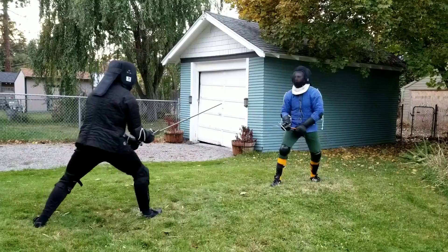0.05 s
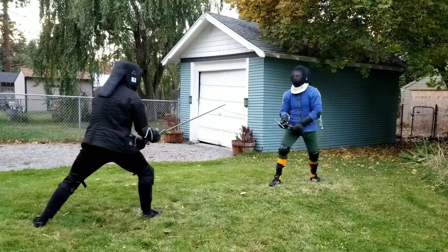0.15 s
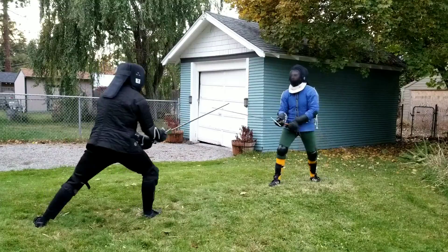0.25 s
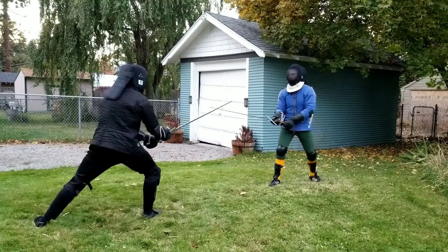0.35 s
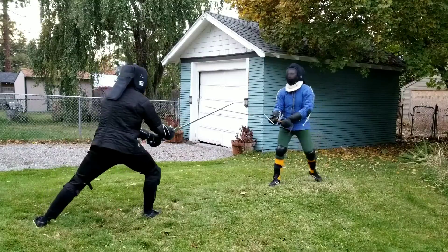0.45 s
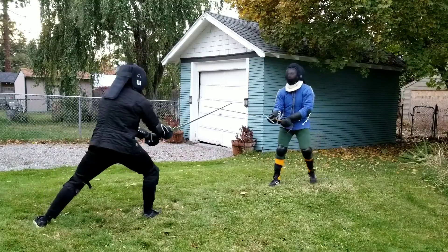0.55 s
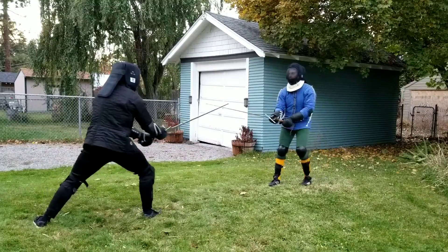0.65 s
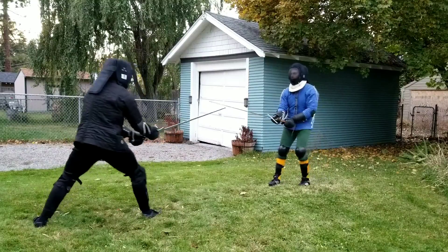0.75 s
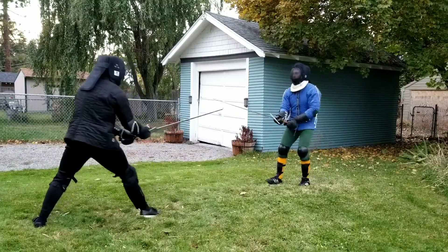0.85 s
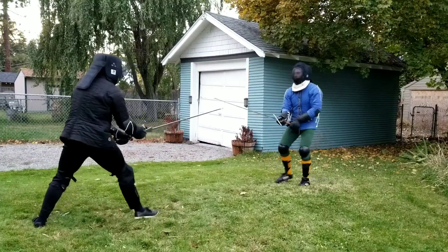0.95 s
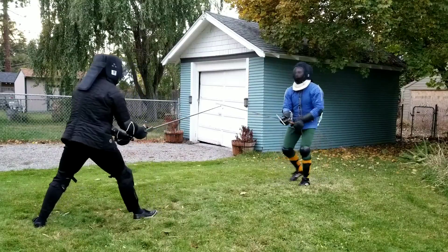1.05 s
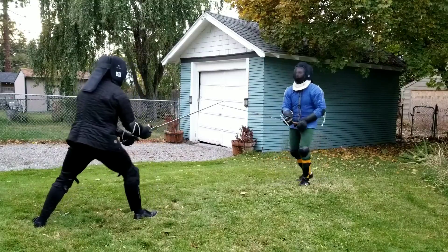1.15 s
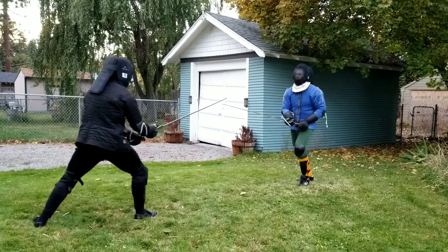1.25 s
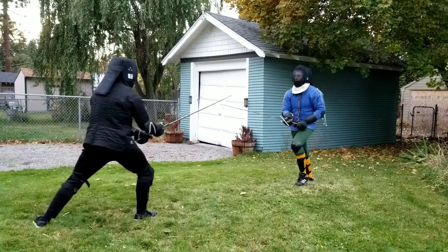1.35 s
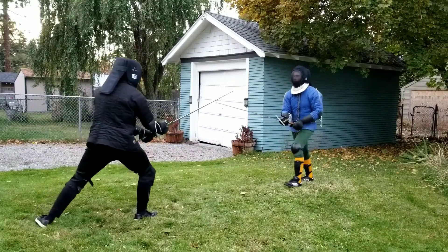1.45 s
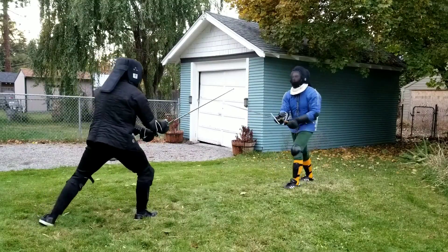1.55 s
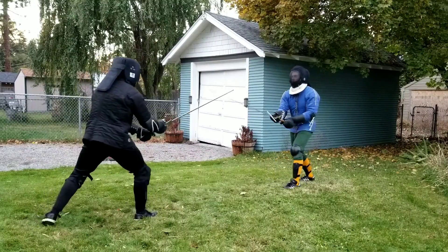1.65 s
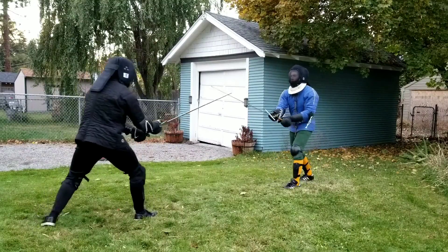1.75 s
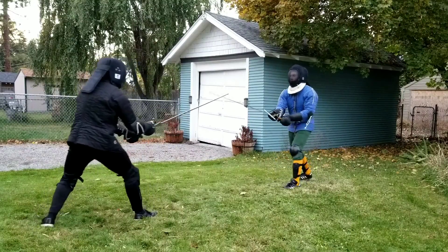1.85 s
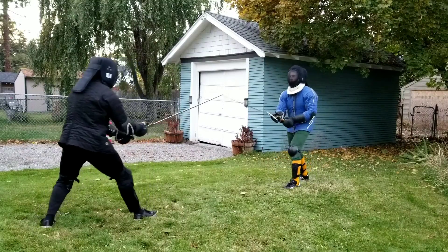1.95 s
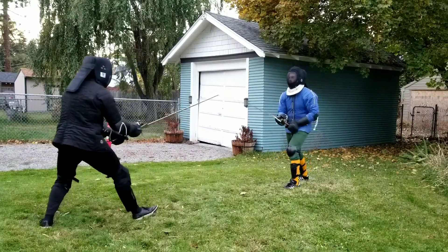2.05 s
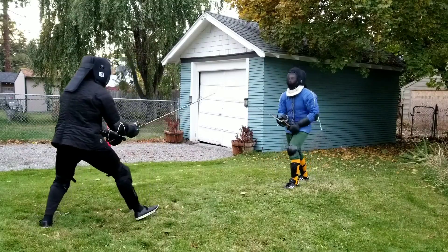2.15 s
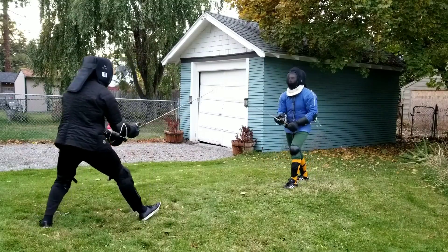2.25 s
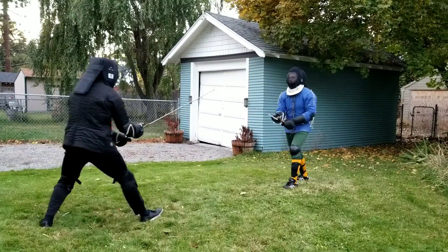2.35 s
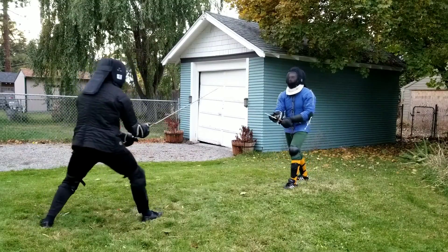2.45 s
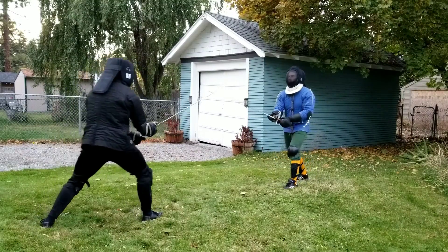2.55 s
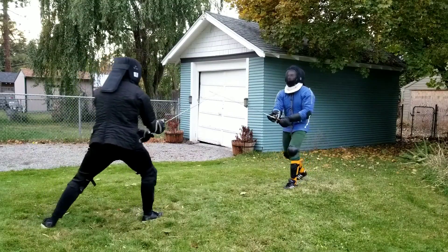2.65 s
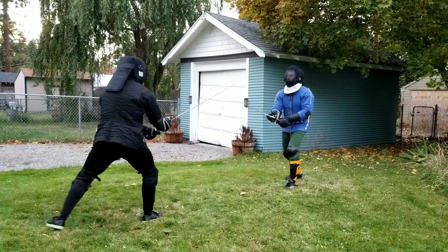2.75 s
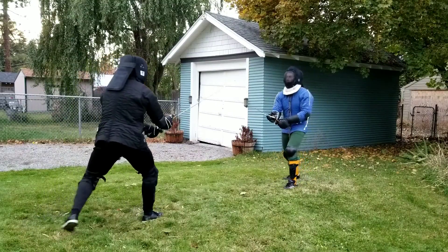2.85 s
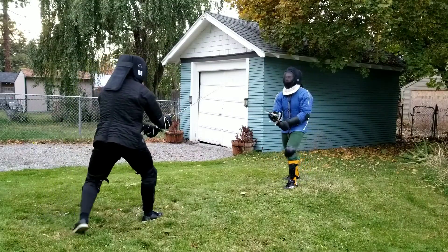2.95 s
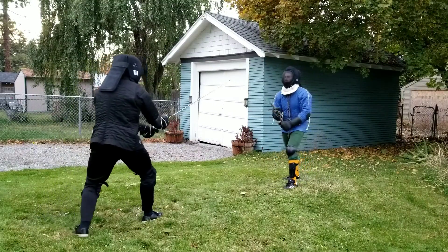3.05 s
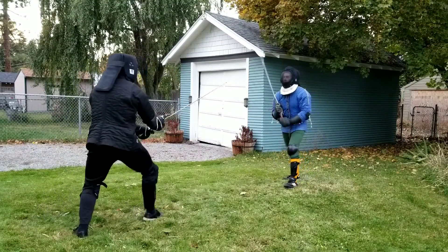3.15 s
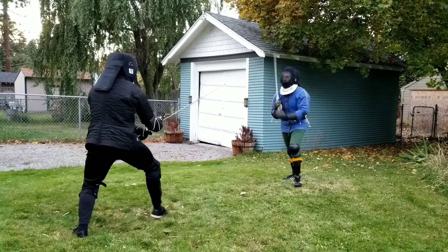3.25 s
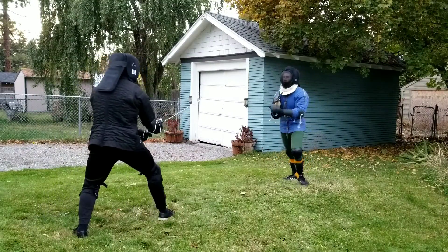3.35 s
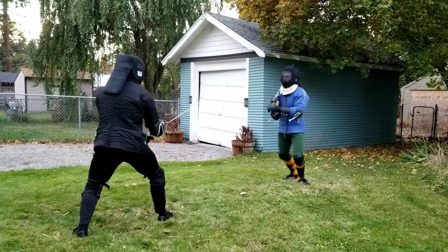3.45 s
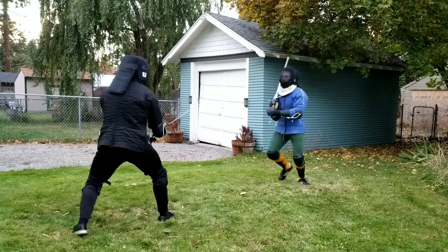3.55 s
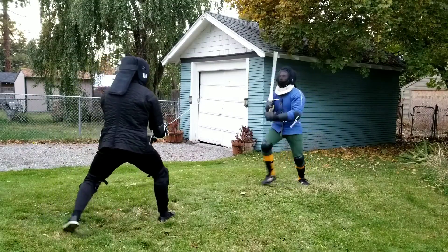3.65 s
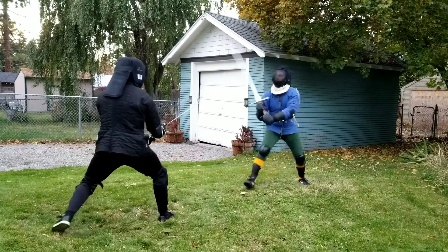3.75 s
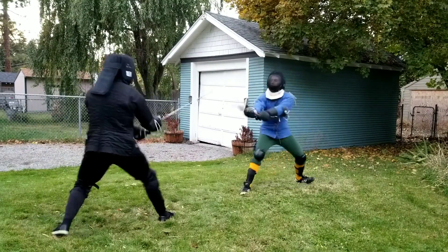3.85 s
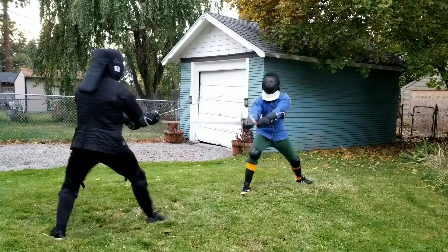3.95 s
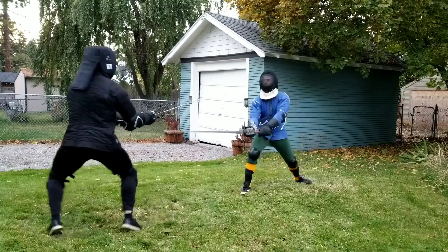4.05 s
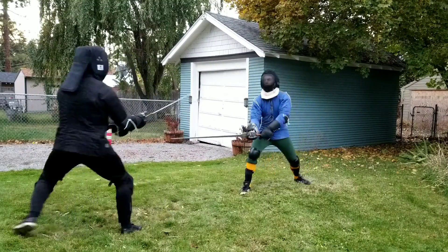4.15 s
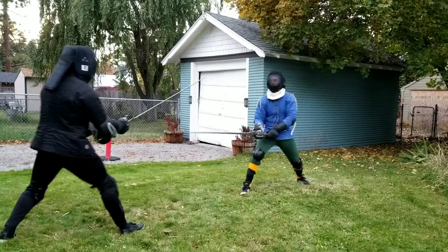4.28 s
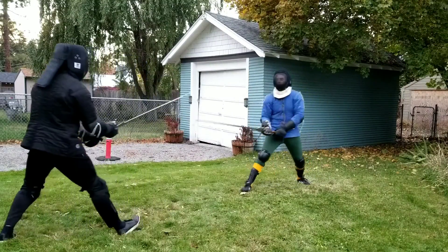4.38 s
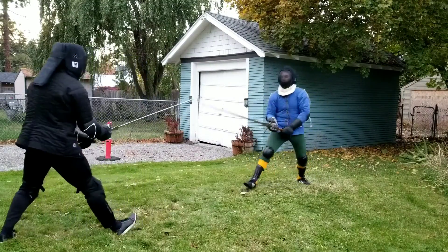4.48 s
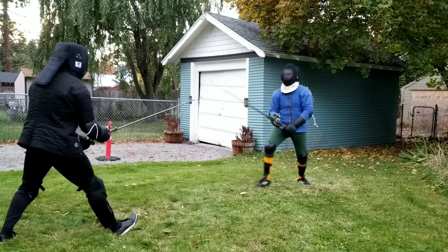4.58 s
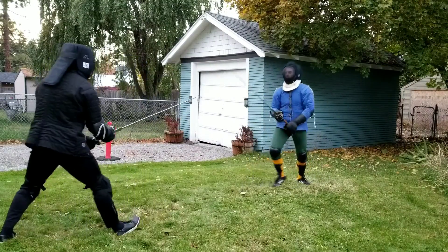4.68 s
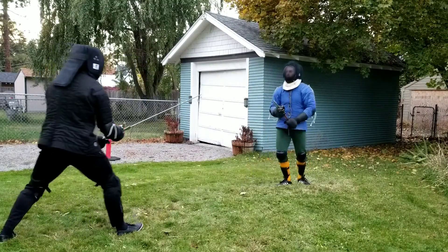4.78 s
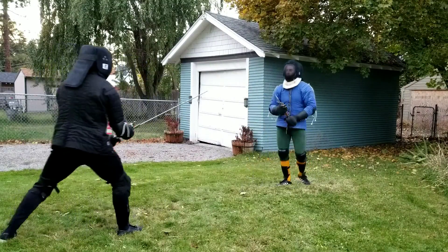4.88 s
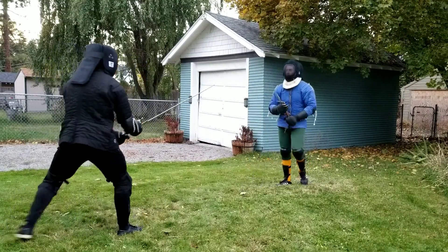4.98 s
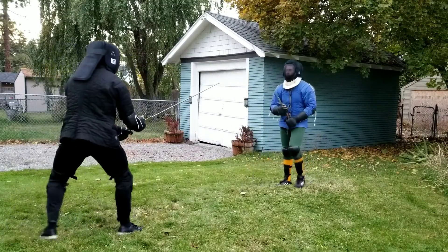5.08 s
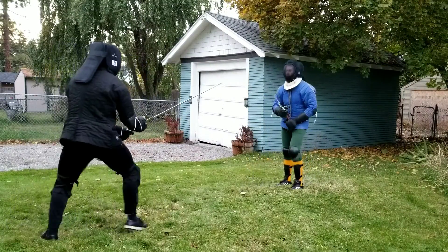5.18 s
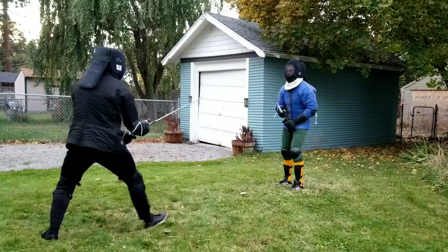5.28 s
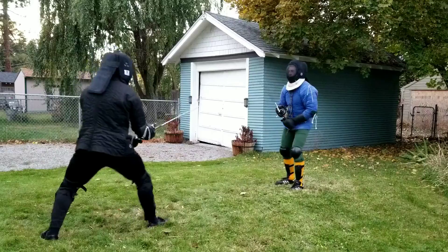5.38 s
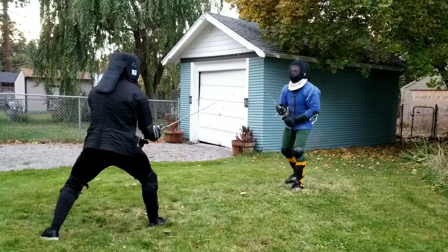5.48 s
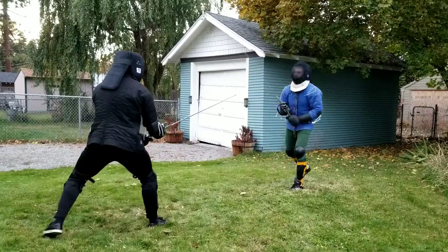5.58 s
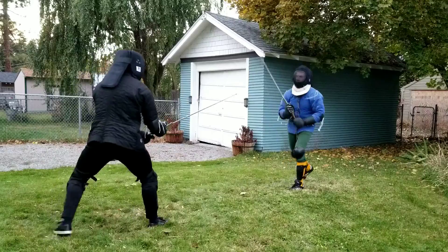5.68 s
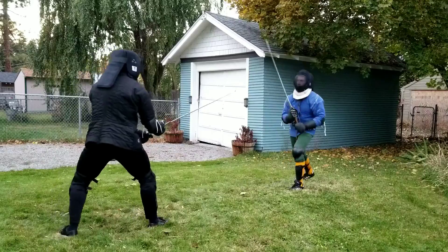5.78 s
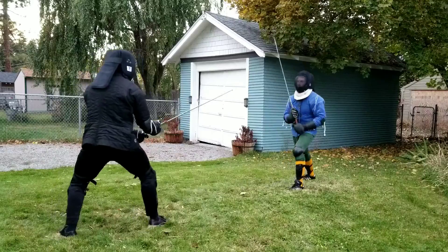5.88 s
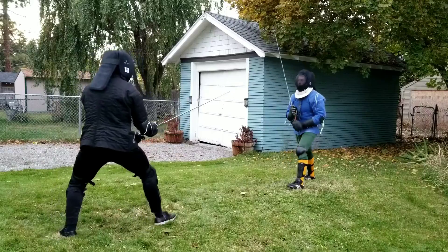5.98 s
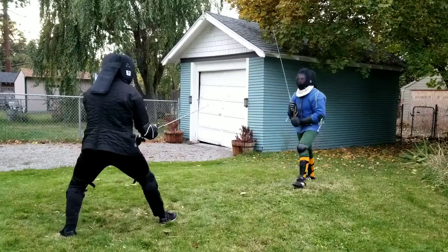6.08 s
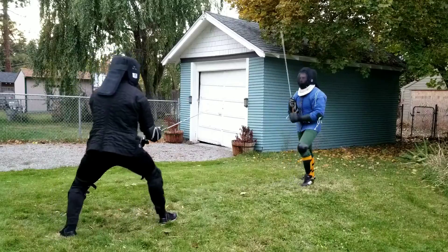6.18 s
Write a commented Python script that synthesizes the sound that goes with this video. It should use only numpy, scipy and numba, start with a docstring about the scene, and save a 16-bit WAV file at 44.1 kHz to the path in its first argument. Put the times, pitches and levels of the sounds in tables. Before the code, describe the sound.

Distant engine rumble and tyre roar lie steadily behind sparring with steel swords. Bright, clattering clinks come irregularly, some crisp and some scraped, with brief scatter off nearby walls and fences. A few tiny gear ticks fall between. The loudest clash arrives about two thirds through, ringing longest, then mostly traffic remains. Stereo phone pickup at some metres, slightly hissy, with dulled extreme treble.

```python
"""A lawn by a garage and fences, two fencers with steel longswords some metres from a phone's two microphones.
Five clashes: decaying sines for the blade modes over a filtered-noise clatter, both fed on by the slide,
with a noise tail for the scatter off garage and fences. A low thud lies under the hardest clash; small ticks
are noise bursts. Behind lie traffic rumble and tyre roar (flickering noise) and a faint wavering hum. The phone
adds hiss, turns its gain down after the hardest clash and keeps it down, and cuts the top."""
import sys
import numpy as np
from scipy import signal
from scipy.fft import rfft, irfft, next_fast_len
from scipy.io import wavfile
from scipy.ndimage import uniform_filter1d
from numba import njit

SR = 44100
rng = np.random.default_rng(int(sys.argv[2]) if len(sys.argv) > 2 else 0)


def pcm_store(signal):
    """Save signal as 16-bit PCM."""
    levels = np.round(np.clip(np.atleast_2d(signal), -1, 1) * 32767)
    wavfile.write(sys.argv[1], SR, levels.astype(np.int16).T)


N = 274290  # samples

# All source levels are ahead of the phone's gain control.
# Clashes: (t/s, near blade ring level/dB, far blade ring level/dB, clatter level/dB, slide/s,
#  slide against first touch for the ring/dB, the same for the clatter/dB, grip t60/s,
#  clatter tilt/dB per octave, knock/dB, left minus right/dB, right microphone lag/ms)
CLASHES = [(0.5029, -28, -41, -30, 0.0098, -14, 1.5, 1.9, -1.5, 6, 2.5, 0.091),
           (0.6851, -47.5, -46, -37, 0.069, 10.5, 1.5, 1.1, -1, 10, 1, 0.23),
           (1.8252, -39, -41, -34.5, 0.019, 6.5, 5.5, 1.1, -0.6, 6.5, 0, 0.3),
           (2.7224, -42.5, -42, -34.5, 0.0078, 3.5, 1.5, 11, -2, 3, 0.7, 0.083),
           (3.9364, -28, -25, -20.5, 0.034, 12.5, 16.5, 0.5, -0.2, -5.5, 2, 0.45)]
# Where each clash lands, as a share of the length from the tip: (near blade, far blade)
PLACES = [(.119, .517), (.338, .516), (.17, .302), (.347, .396), (.042, .531)]
# Bending modes of each sword: (f/Hz, level when struck at a belly/dB, t60/s)
NEAR_BLADE = [(1340, -19, 0.22), (1650, -13, 0.25), (1886, -14, 0.25), (2976, -8, 0.36), (3228, -15, 2.8),
              (3547, -10, 0.32), (3581, -11, 0.5), (5391, -8, 0.24), (5817, -7, 0.37), (6324, -7, 0.3),
              (6635, -9, 0.38), (7378, -11, 0.28), (7766, -13, 0.35), (7865, 3, 0.21), (8342, 3, 0.18),
              (9399, -17, 0.28), (10811, -23, 0.4), (11835, -6, 0.33), (12115, -14, 0.2), (12495, -17, 0.4),
              (13290, -15, 0.25), (13950, -10, 0.29)]
FAR_BLADE = [(2935, -4, 0.25), (3913, -11, 0.7), (4172, -9, 0.35), (4213, -6, 0.18), (4390, -13, 0.39),
             (4502, -18, 0.34), (4793, -6, 0.38), (5106, -7, 0.21), (5731, -20, 0.4), (5965, -19, 0.29),
             (6815, -8, 0.23), (8068, -12, 0.32), (8105, -8, 0.2), (8592, -13, 0.4), (9519, -13, 0.37),
             (9750, -15, 0.4), (12615, -12, 0.25), (12870, -20, 0.3)]
# Colour of the clatter: (f/Hz, level/dB)
CLATTER_COLOUR = [(450, -30), (900, -7.5), (1400, -6.5), (2200, -7.5), (3000, -1.5), (5000, 3), (7000, 4),
                  (9500, 0), (12500, 0.5), (15000, 0.5)]
# Small ticks of buckles and guards: (t/s, level ahead of the decay/dB, pitch near the band's top f/Hz)
TICKS = [(2.142, -54, 7600), (2.165, -50.5, 8300), (4.416, -52, 5200)]
# Course of the traffic: (t/s, engine rumble level/dB, tyre roar level/dB)
TRAFFIC = [(0, -42, -44.5), (.5, -41, -46), (1.2, -40, -44), (1.8, -41, -43), (2.4, -39, -42.5),
           (3.2, -39.5, -42), (3.901, -38, -41), (4.5, -38.5, -41.5), (5.1, -38.5, -42), (5.7, -40.5, -44),
           (6.22, -42.5, -43)]
# Relative spectra of engine rumble, tyre roar and microphone hiss: (f/Hz, level/dB per Hz)
RUMBLE_COLOUR = [(15, -33), (28, -17), (45, 1.5), (80, 1.5), (140, -4), (230, -5.5), (300, -12), (450, -20),
                 (800, -50.5)]
TYRE_COLOUR = [(150, -26), (300, -5), (460, -5.5), (750, -1.5), (1050, -0.4), (1630, -8.5), (2400, -18.5),
               (3440, -26.5), (6000, -48)]
HISS_COLOUR = [(1500, -15), (3500, 2.5), (6900, 2.5), (7600, -1), (9800, -6), (11500, -2.5), (13900, 2),
               (15000, -2.5)]
# Hum tones: (f/Hz, waver rate f/Hz, level/dB, level sway/dB)
HUM_TONES = [(362.7, 4, -57, 2), (230.6, 18, -54, 5)]
# Likeness of the two channels in the diffuse noise: (f/Hz, left-right correlation)
LIKENESS = [(60, 0.97), (130, 0.98), (290, 0.93), (630, 0.48), (1390, 0.27), (3050, 0.099), (6700, 0.052)]
# Imbalance of the two microphone ports: (f/Hz, left minus right/dB)
PORTS = [(60, -2), (110, -2), (200, -4.5), (380, -4), (690, -4.5), (1270, -5.0), (2350, -7), (4330, -4),
         (7980, 2.5), (14700, 3.5)]

BEND_HZ = 9  # mode frequency = BEND_HZ x (half-waves along the blade)^2
NODE_LEAK = .1  # share of a mode that still sounds when struck at a node
WAVER_HZ, THICKET_HZ = 35.2, 44.54  # how fast a mode wavers; spacing of the weak modes
BODY_HZ = 2500  # below this the hilts and thick blade parts knock
SPLIT_HZ, TREBLE_SHARE = 2270, 0.57  # above this the clatter dies sooner, in this share of the time
CLATTER_T60_S = .175
CLASH_SIZE = 32768  # samples
YARD_T60_S, YARD_TREBLE_T60_S = 0.45, 0.21
YARD_DB, YARD_GAP_S = -6.5, 0.0082  # scatter energy against the direct sound; wait before it
THUD_S, THUD_DB, THUD_RISE_S = 3.938, -31, .016  # start, envelope peak, time to the peak
THUD_HZ, THUD_SAG_HZ = 640, 130  # starting pitch and its fall
HISS_DB = -62
GAIN_TOP_DB, GAIN_SLOPE = -25, 0.48  # threshold; dB of cut per dB above it
GAIN_ATTACK_S, GAIN_RELEASE_S = 0.01, 60
TOP_HZ = 14500
AIM = np.array([[1], [-1]])  # left, right


def swords():
    """Every clash at its moment, then the scatter from garage and fences; air and wood dull the scatter."""
    t = np.arange(SR // 2) / SR
    low, high = split(rng.standard_normal((2, SR // 2)))
    low_tail = low * undb(-60 * t / YARD_T60_S)
    high_tail = high * undb(-60 * t / YARD_TREBLE_T60_S)
    yard = (low_tail + high_tail) * (t > YARD_GAP_S)
    yard *= undb(YARD_DB) / np.sqrt(np.sum(yard ** 2, axis=1, keepdims=True))
    yard[:, 0] = 1  # direct sound
    out = np.zeros((2, N))
    for (near_place, far_place), (s, *how) in zip(PLACES, CLASHES):
        heard = signal.fftconvolve(clash(near_place, far_place, *how), yard, axes=1)
        out[:, int(s * SR):int(s * SR) + heard.shape[1]] += heard
    return out


def clash(near_place, far_place, near_db, far_db, clatter_db, slide_s, ring_slide_db, slide_db,
          grip_s, tilt_db, knock_db, pan_db, lag_ms):
    """Blade modes over a dense clatter of edges and weaker modes, as the two ports receive them."""
    modes = struck(NEAR_BLADE, near_db, near_place) + struck(FAR_BLADE, far_db, far_place)
    out = blade_ring(modes, slide_s, ring_slide_db, grip_s, lag_ms)
    out += edge_clatter(clatter_db, slide_s, slide_db, tilt_db, knock_db, lag_ms)
    out *= np.minimum(np.arange(CLASH_SIZE) / SR / .0006, 1)  # onset in 0.6 ms
    hz = np.fft.rfftfreq(CLASH_SIZE, 1 / SR)
    return irfft(rfft(out) * undb(AIM * (read(PORTS, hz) + pan_db) / 2))


def struck(blade, ring_db, place):
    """Modes of a blade hit at a place: loud at a belly of the standing wave, weak at a node."""
    modes = []
    for hz, db, t60 in blade:
        half_waves = np.sqrt(hz / BEND_HZ)
        shape = np.cos(np.pi * (half_waves * place + 1 / 4))
        modes.append((hz, ring_db + db + 20 * np.log10(np.hypot(shape, NODE_LEAK)), t60))
    return modes


def blade_ring(modes, slide_s, ring_slide_db, grip_s, lag_ms):
    """Decaying blade modes, damped by the grip; a flexing, swinging blade wavers their level and phase."""
    out = np.zeros((2, CLASH_SIZE))
    lag = np.array([[0], [lag_ms / 1000]])
    for hz, ring_db, t60 in modes:
        phase, turn, lean = rng.standard_normal(3)
        held_t60 = 1 / (1 / t60 + 1 / grip_s)  # losses of blade and grip add
        k = min(int(held_t60 * SR + slide_s * SR), CLASH_SIZE)
        t = np.arange(k) / SR
        sway, slip = (np.interp(t * WAVER_HZ, range(64), v) for v in rng.standard_normal((2, 64)))
        sway_db = 2.53 * sway * np.minimum(t / 0.07, 1)  # grows over 70 ms
        loud = undb(ring_db + sway_db) * fed(t, held_t60, slide_s, ring_slide_db)
        angle = 2 * np.pi * (hz * (t - lag) + phase) + .3 * turn * AIM + .45 * slip
        out[:, :k] += loud * undb(1.5 * lean * AIM) * np.sin(angle)
    return out


def edge_clatter(clatter_db, slide_s, slide_db, tilt_db, knock_db, lag_ms):
    """Noise made spiky by a thicket of weak modes; sliding edges catch and let go, the treble dies sooner."""
    t = np.arange(CLASH_SIZE) / SR
    hz = np.fft.rfftfreq(CLASH_SIZE, 1 / SR)
    shared, left, right = rng.standard_normal((3, CLASH_SIZE))
    late = np.roll(shared, int(lag_ms * SR / 1000))
    noise = np.array([shared + .6 * left, late + .6 * right])
    thicket_db = 3.5 * np.interp(hz / THICKET_HZ, range(1024), rng.standard_normal(1024))
    body_db = knock_db / (1 + (hz / BODY_HZ) ** 6)
    noise = colour(irfft(rfft(noise) * undb(thicket_db + body_db)), CLATTER_COLOUR, tilt_db)
    low, high = split(level(noise, clatter_db))
    out = np.zeros((2, CLASH_SIZE))
    for band, t60 in ((low, CLATTER_T60_S), (high, CLATTER_T60_S * TREBLE_SHARE)):
        chatter = undb(2.5 * walk(700, size=CLASH_SIZE) * (t < slide_s + .015))
        out += band * chatter * fed(t, t60, slide_s, slide_db)
    return out


def fed(t, t60, slide_s, slide_db):
    """Amplitude of a resonance that takes a first touch, then more energy while the blades slide."""
    rate = 2 * np.log(1000) / t60  # energy decay per second
    held = np.minimum(t, slide_s)
    built = (np.exp(-rate * (t - held)) - np.exp(-rate * t)) / (rate * slide_s)
    return np.sqrt(np.exp(-rate * t) + undb(2 * slide_db) * built)


def thud():
    """Under the hardest clash: a low knock that swells, sags in pitch and dies."""
    t, out = np.arange(SR // 5) / SR, np.zeros(N)
    hz = THUD_HZ - THUD_SAG_HZ * (1 - np.exp(-t / (2 * THUD_RISE_S)))
    x = t / THUD_RISE_S
    knock = undb(THUD_DB) * x * np.exp(1 - x) * np.sin(2 * np.pi * np.cumsum(hz) / SR)
    out[int(THUD_S * SR):][:len(t)] = knock
    return out


def ticks():
    """Buckles and guards: band-passed noise bursts that die within milliseconds."""
    out, t = np.zeros((2, N)), np.arange(SR // 20) / SR
    for s, db, hz in TICKS:
        sos = signal.butter(1, [hz / 1.5, hz * 1.05], "bandpass", fs=SR, output="sos")
        noise = signal.sosfilt(sos, rng.standard_normal((2, len(t))))
        out[:, int(s * SR):int(s * SR) + len(t)] += level(noise, db) * np.exp(-t / 0.0041)
    return out


def traffic():
    """Distant engine rumble and tyre roar: two coloured noises that follow the traffic levels."""
    s, *columns = np.transpose(TRAFFIC)
    rumble_db, tyre_db = (np.interp(np.arange(N) / SR, s, c) for c in columns)
    rumble = undb(rumble_db) * far_noise(RUMBLE_COLOUR, 1.357, 5)
    tyres = undb(tyre_db) * far_noise(TYRE_COLOUR, 0.91, 8.8)
    return rumble + tyres


def hum():
    """Narrow tones whose phase and level waver at random."""
    t, out = np.arange(N) / SR, np.zeros(N)
    for hz, rate, db, sway_db in HUM_TONES:
        tone = np.sin(2 * np.pi * hz * t + 1.2 * walk(rate))
        out += level(tone * undb(sway_db * walk(rate)), db)
    return out


def far_noise(table, flicker_db, rate):
    """Octave noise bands that flicker alone, alike left and right in the bass, tilted by the ports."""
    size = next_fast_len(N)
    hz = np.fft.rfftfreq(size, 1 / SR)
    like = np.clip(read(LIKENESS, hz), 0, 1)
    mid, side = rfft(rng.standard_normal((2, size))) * np.sqrt([1 + like, 1 - like])
    pan = undb(read(PORTS, hz) / 2)
    both = np.array([(mid + side) * pan, (mid - side) / pan]) * undb(read(table, hz))
    octave = np.log2(np.maximum(hz, 1))
    out = np.zeros((2, N))
    for centre in range(int(np.log2(table[1][0])), int(np.log2(table[-1][0])) + 2):
        band = irfft(both * np.clip(1 - abs(octave - centre), 0, 1), size)[:, :N]
        out += band * undb(flicker_db * walk(rate))
    return level(out, 0)


def walk(rate, size=N):
    """Random levels held 1 / rate s and slewed twice; spread near 1."""
    k = int(SR / rate)
    steps = np.repeat(rng.standard_normal(size // k + 1), k)
    return 1.3 * uniform_filter1d(uniform_filter1d(steps, k), k)[:size]


def split(x):
    """Bass and treble parts that add up to x."""
    low = signal.lfilter(*signal.butter(1, SPLIT_HZ, fs=SR), x)
    return low, x - low


def colour(x, table, tilt_db=0.):
    """Filter by a (f/Hz, level/dB) table and a tilt about 5 kHz, the tilt held level below 500 Hz."""
    hz = np.fft.rfftfreq(x.shape[-1], 1 / SR)
    tilt = tilt_db * np.log2(np.maximum(hz, 500) / 5000)
    return irfft(rfft(x) * undb(read(table, hz) + tilt), x.shape[-1])


def read(table, hz):
    """Value of a (f/Hz, value) table on a log-frequency axis."""
    f, v = np.transpose(table)
    return np.interp(np.log(np.maximum(hz, 1)), np.log(f), v)


def level(x, db):
    """Scale x to an RMS level in dB re full scale."""
    return x * undb(db) / np.sqrt(np.mean(x ** 2))


def undb(db):
    """Amplitude ratio of a level in dB."""
    return 10 ** (np.asarray(db) / 20)


def scene():
    """Swords in front, traffic and hum behind."""
    return swords() + thud() + ticks() + traffic() + hum()


@njit
def follow(power, attack, release):
    """Power follower: quick up, very slow down."""
    out, e = np.empty(len(power)), 0.
    for i in range(len(power)):
        e += (power[i] - e) * (attack if power[i] > e else release)
        out[i] = e
    return out


def record(dry):
    """Microphone hiss, gain control that backs off after a loud sound, then the top is cut."""
    mic = dry + undb(HISS_DB) * far_noise(HISS_COLOUR, 0.592, 16)
    power = uniform_filter1d(np.mean(mic ** 2, axis=0), size=SR // 100)  # over 10 ms
    loud = follow(power, 1 / (GAIN_ATTACK_S * SR), 1 / (GAIN_RELEASE_S * SR))
    excess = np.maximum(loud / undb(2 * GAIN_TOP_DB), 1)  # power above the threshold
    gain = excess ** (-GAIN_SLOPE / 2)
    top_cut = signal.ellip(10, .2, 60, TOP_HZ, fs=SR, output="sos")
    return signal.sosfilt(top_cut, mic * gain)


dry = scene()
out = record(dry)
pcm_store(out)
```